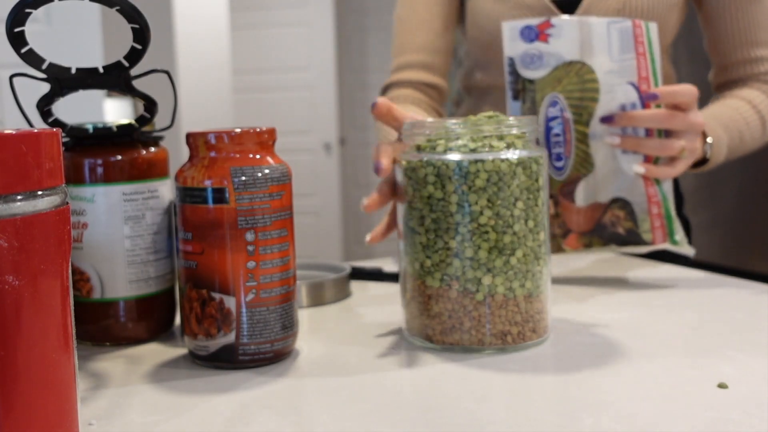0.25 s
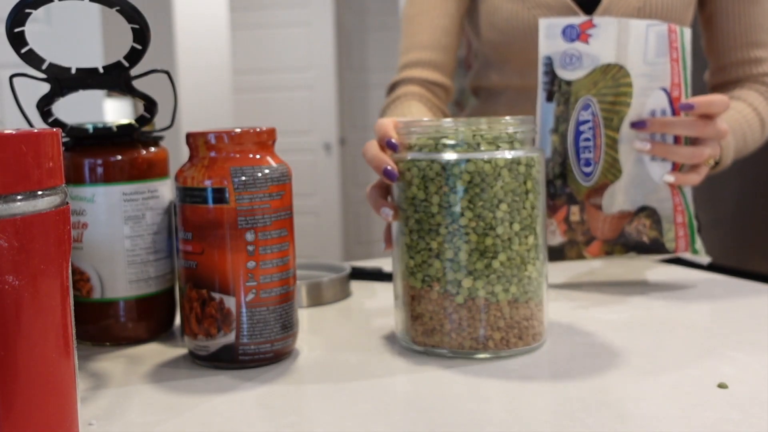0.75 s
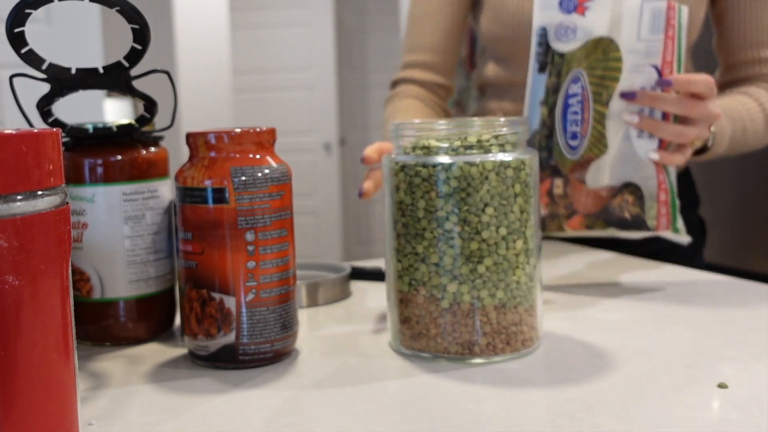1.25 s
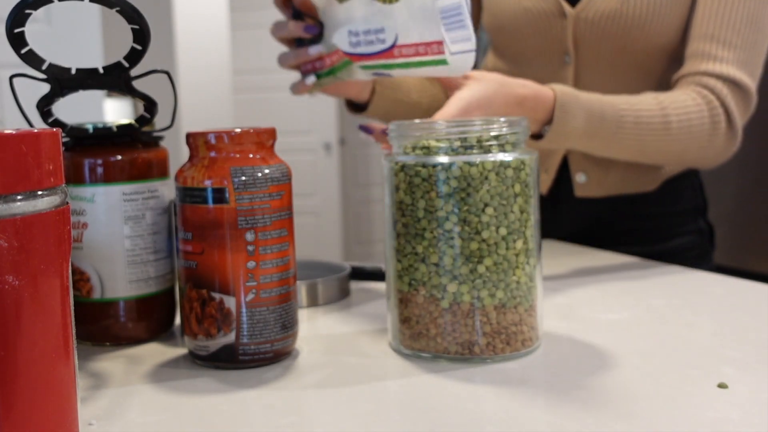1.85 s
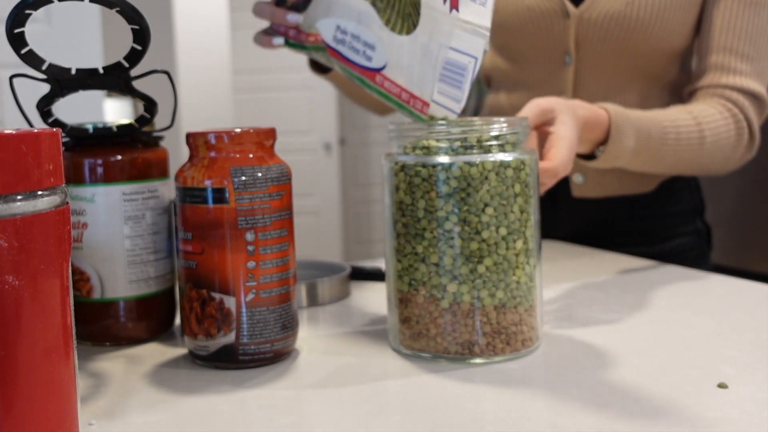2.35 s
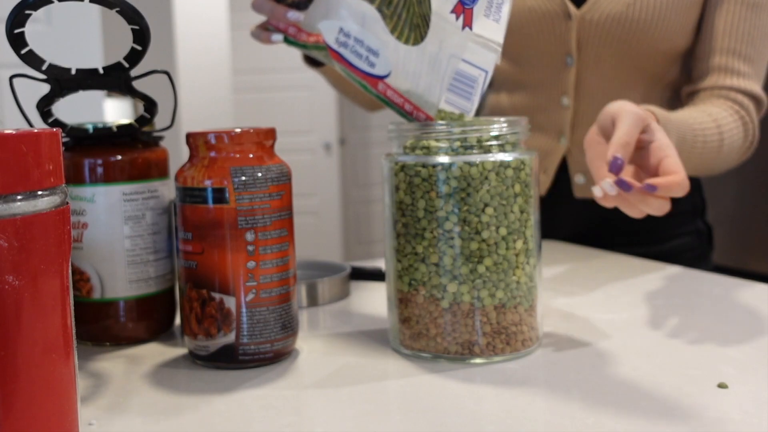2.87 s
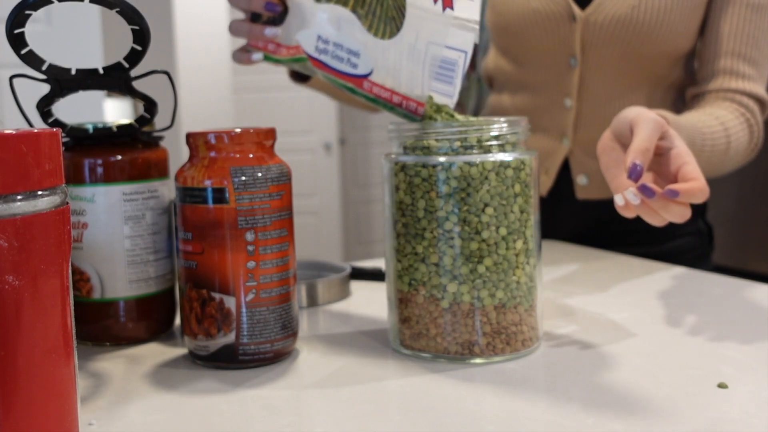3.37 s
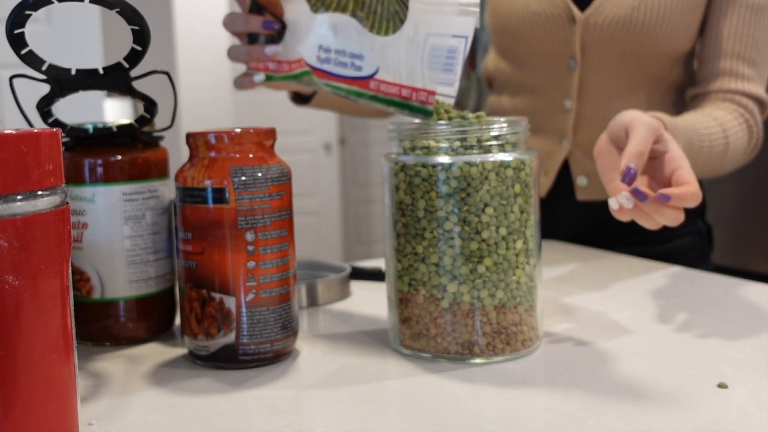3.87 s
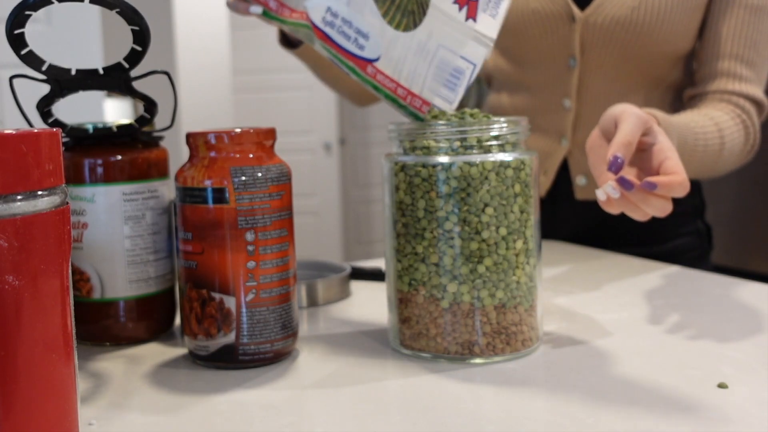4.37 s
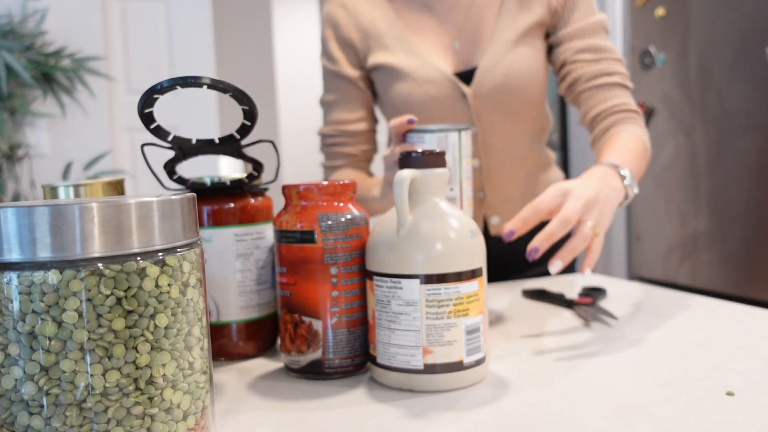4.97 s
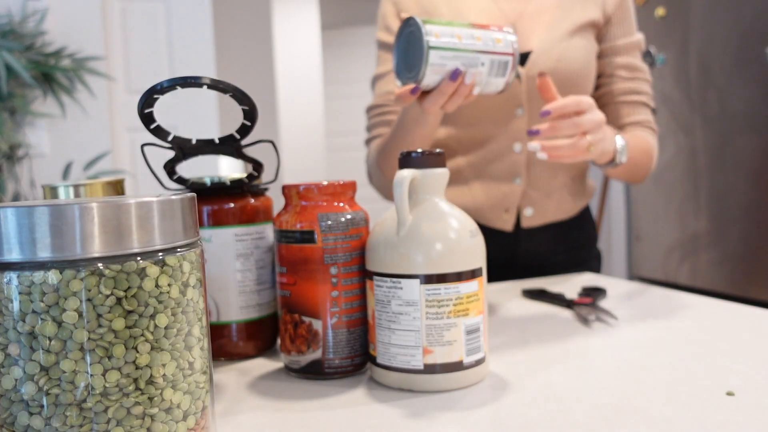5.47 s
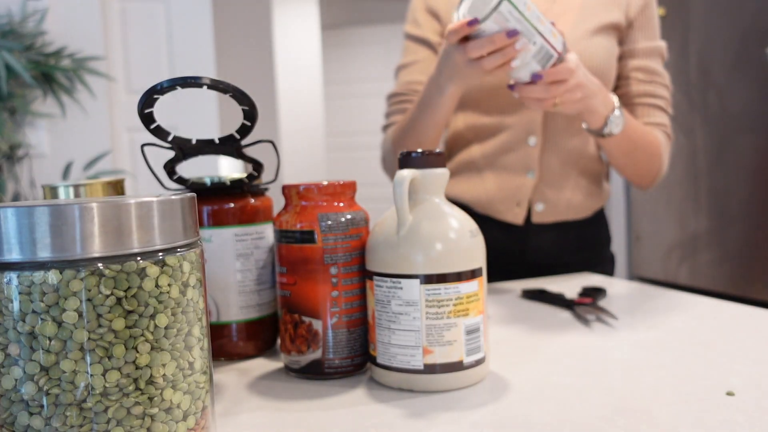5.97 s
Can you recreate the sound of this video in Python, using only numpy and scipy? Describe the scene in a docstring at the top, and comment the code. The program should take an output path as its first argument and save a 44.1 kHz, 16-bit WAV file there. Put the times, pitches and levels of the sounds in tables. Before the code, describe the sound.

Close stereo sound in a small hard kitchen, with low room tone and faint appliance hum. From 0 to 0.3 s a dense rush of dried peas fades amid plastic snaps. From about 0.35 to 1.3 s a full glass jar is rocked and knocked on a stone counter, strongest near 0.36, 0.63, 0.84 and 1.03 s: short, damped, woody-glassy thumps with a slight ring and peas shuffling down. Light handling follows, then a loud bag snap at 1.67 s. Peas pour from 1.8 to 3.5 s, bright and rattling with small crackles, then in thinner, intermittent surges until a sudden cut at 4.6 s. A heavy low bump leads into a soft gritty slide; at 4.95-5.02 s a plastic jug lands and rocks in a loud hollow clatter. Near-quiet follows, with delicate nail ticks and a faint paper brush at 5.6 s and a tiny tick at 6.15 s.

```python
"""Dried peas poured into a glass jar

Dried peas pour from a plastic bag into a glass jar on a stone counter: dense random impacts coloured by resonance.
After the first pour the jar is rocked and tapped down, each blow exciting damped modes, while its peas settle.
A sudden cut between two scenes ends the pouring and its echoes just before a plastic jug slides.
The slide is scraping noise, the jug lands as modal blows, and a fingernail ticks and brushes a can label.
Sparse decaying echoes of a small hard room follow each blow, over filtered noise for a faint appliance hum."""
import sys
import numpy as np
from scipy import signal
from scipy.fft import rfft, irfft
from scipy.io import wavfile
from scipy.ndimage import uniform_filter1d

SR = 44100
rng = np.random.default_rng(int(sys.argv[2]) if len(sys.argv) > 2 else 0)


def store_pcm(level_fs):
    """Save levels as 16-bit WAV."""
    pcm = np.round(np.clip(level_fs, -1, 1) * 32767).astype(np.int16)
    wavfile.write(sys.argv[1], SR, np.atleast_2d(pcm).T)


def gain_from_db(level_db):
    """Convert decibel levels to linear amplitude factors (20 dB per decade)."""
    decades = np.asarray(level_db, float) / 20
    return 10 ** decades


N = 274743  # length in samples

# Room tone spectrum: frequency_hz, relative_density_db
AIR_SPECTRUM = [(15, -58), (25, -33.5), (82, -7), (114, 0.5), (242, -3), (427, 0), (503, -8.5), (545, -4.5),
                (714, 7), (818, -7.5), (1100, -4.5), (1330, -9), (16000, -32.5)]
AIR_LEVEL_DB = -56.5  # rms
# Appliance hum bands: centre_hz, width_hz, level_db
HUM_BANDS = [(226, 210, -65), (715, 75, -67)]
# Left-right likeness of the background: frequency_hz, likeness (0 to 1)
AIR_LIKENESS = [(60, 0.87), (240, 0.46), (950, 0.12), (3770, 0.23), (15000, 0.95)]
# Reverberation time: frequency_hz, t60_s
ROOM_DECAY = [(125, 0.97), (500, 0.36), (2000, 0.41), (6000, 0.35), (14000, 0.25)]
# Left-right likeness of the echoes: frequency_hz, likeness (0 to 1)
ROOM_LIKENESS = [(150, 0.94), (350, 0.94), (1200, 0.78), (3000, 0.98), (12000, 0.98)]
SCENE_CUT_S = 4.597  # a sudden cut between two scenes ends the pouring and its echoes

# Fingernail ticks on the can label: start_s, peak_db, centre_hz
NAIL_TICKS = [(5.6052, -30, 5860), (5.61, -38, 4660), (6.1467, -37.5, 10600)]
# Fingers brushing the paper label: time_s, level_db
BRUSH_LEVEL = [(5.612, -41.5), (5.618, -54.5), (5.75, -75), (5.8, -78)]
# Paper rustle spectrum: frequency_hz, relative_density_db
PAPER_SPECTRUM = [(1470, -46), (2500, -14.5), (3660, -13), (5270, 0), (7500, -6), (11200, -17),
                  (16000, -23)]

# A heavy container is bumped: start_s, peak_db, hardness_db (gain of the high modes), spot_pitch_hz
BUMP_BLOWS = [(4.604, -20, 18, 148), (4.614, -39, 15, 166), (4.623, -17.5, 14, 315), (4.639, -28, -4, 91.5)]
# Modes of the counter, before damping: frequency_hz, width_hz, relative_level_db
COUNTER_MODES = [(84, 100, -6), (150, 85, 4.5), (228, 110, -8), (326, 77, -8.5), (700, 140, -15),
                 (1300, 400, -13.5), (4220, 420, -32.5)]
# The jug slides over the counter: time_s, level_db
SLIDE_LEVEL = [(4.6, -35), (4.66, -37), (4.76, -39.5), (4.84, -40), (4.892, -40.5), (4.945, -39)]
# Grit scrape spectrum: frequency_hz, relative_density_db
SCRAPE_SPECTRUM = [(590, -13), (1000, -9), (1870, -6), (2010, -6), (2780, -2.5), (3800, -4), (4260, -5.5),
                   (9600, -19), (14100, -29), (16000, -41.5)]
# The jug lands and rocks: start_s, peak_db, hardness_db, spot_pitch_hz
JUG_BLOWS = [(4.945, -16, -3, 710), (4.951, -14, -4, 740), (4.961, -12.5, -23, 720), (4.967, -11, 1, 1080),
             (4.972, -4.5, 11, 905), (4.987, -6, 5, 730), (4.991, -15, 14, 650), (5.002, -7.5, -0.5, 640),
             (5.006, -13, 7, 656), (5.013, -17.5, -3, 690)]
# Modes of the plastic jug, before damping: frequency_hz, width_hz, relative_level_db
JUG_MODES = [(88.5, 17, -24), (230, 69, -3), (392, 68, -0.5), (618, 123, -1.5), (738, 90, 3),
             (1010, 160, 2.5), (1080, 370, -5), (1380, 130, -9.5), (1800, 50, -7.5), (2290, 100, -17.5),
             (2770, 110, -22), (2960, 660, -24), (4150, 230, -28), (7680, 230, -41)]

# The jar rings as its base meets the counter, and at 1.997 s as a clump of peas strikes it: start_s, peak_db,
# hardness_db, spot_pitch_hz
JAR_BLOWS = [(0.082, -16, 15, 950), (0.228, -22.5, 14, 860), (0.248, -28, -9, 950), (0.275, -27, -3, 950),
             (0.351, -19, -9, 799), (0.363, -2, -0.5, 697), (0.45, -7, -15, 860), (0.549, -12.5, -3, 710),
             (0.633, -1, -3, 660), (0.645, -6, -6, 573), (0.656, -10, 3.5, 540), (0.709, -23.5, -5, 950),
             (0.75, -11.5, -22, 367), (0.818, -36, 0, 805), (0.838, 0, 5.5, 780), (1.017, -4, -6.5, 814),
             (1.03, -6.5, -22, 830), (1.052, -16, -1, 830), (1.12, -20.5, -7.5, 850),
             (1.229, -19, -20, 840), (1.244, -18, 6.5, 875), (1.299, -30, 31, 738), (1.331, -27, -9, 820),
             (1.379, -29, -8, 860), (1.668, -16, 1, 825), (1.997, -21, -17, 800)]
# Modes of the filled jar, before damping: frequency_hz, width_hz, relative_level_db
JAR_MODES = [(85, 51, -10.5), (221, 40, -6), (365.6, 21, 1), (559.6, 44, 0.5), (712, 51, -2), (799, 97, 5),
             (950, 55, -5), (1138, 110, -3.5), (1417, 190, -1), (1630, 220, -15.5), (1940, 79, -11),
             (2540, 450, -14), (3400, 95, -30), (4020, 240, -26), (6000, 150, -31)]
# Blows that set the free glass wall singing: start_s, level_db
WALL_BLOWS = [(0.633, -34.5), (0.8524, -32.5)]
# Modes of the free glass wall: frequency_hz, relative_level_db, t60_s
WALL_MODES = [(1975, -5, .2), (4237, -3, .27)]
# How hard the full jar rocks on its base: time_s, force_db
ROCKING_FORCE = [(.33, -34.5), (.347, -26.5), (.362, -32), (.368, -18), (.459, -36.5), (.62, -34.5),
                 (.632, -17.5), (.768, -30.5), (.775, -48), (.845, -16.5), (.85, -17.5), (.968, -25.5),
                 (1.018, -41), (1.023, -27), (1.065, -32), (1.118, -37), (1.124, -29.5), (1.2, -46.5),
                 (1.222, -75), (1.228, -28.5), (1.3, -49), (1.4, -81.5)]
CONTACT_RANGE_HZ = 780, 930  # pitches of the spots the base rocks on
# Spectrum of peas shuffling down: frequency_hz, relative_density_db
SHUFFLE_SPECTRUM = [(1760, -36), (3000, -10), (3700, -14), (4380, -16), (4470, -6.5), (5110, -12.5),
                    (5960, -6), (6900, -12.5), (11000, -12.5), (16000, -33)]
SETTLE_DB, SETTLE_PER_DB, SETTLE_S = -24, 1.2, 0.073  # level at 0 dB force, dB per dB, lingering time

# Plastic film snaps and lone peas tick: start_s, peak_db, centre_hz
SNAP_BURSTS = [(0.0207, -7, 2430), (0.1098, -12.5, 2080), (0.2275, -11.5, 2700), (0.793, -28, 5860),
               (1.3536, -47, 5560), (1.4232, -27.5, 2995), (1.5993, -21, 2290), (1.6222, -24.5, 2900),
               (1.6656, -1.5, 2630), (1.6682, -20, 2570), (2.1049, -29, 2320), (3.5746, -23.5, 3780),
               (3.616, -26.5, 3920), (3.7915, -27, 2280), (3.993, -27, 2220), (4.4748, -20.5, 2540),
               (4.6034, -24, 3720), (4.6533, -30, 3970), (4.9437, -24, 2770), (4.9571, -19, 4990),
               (4.9612, -9.5, 2085)]
SNAP_EDGE_DB, TICK_EDGE_DB = -33, -7.5  # added treble edge of each burst
CRACKLES_PER_S, CRACKLE_ABOVE_FLOW_DB, CRACKLE_HZ = 30, 8, 2700  # rate, most above the flow, base pitch
# Peas falling on the heap, one curve for each tilt of the bag: time_s, flow_db
POUR_CURVES = [
    [(0.0, -22.5), (0.12, -28.5), (0.226, -49.5), (0.229, -27.5), (0.33, -69.5)],
    [(1.376, -68), (1.382, -44.5), (1.5, -44), (1.582, -52.5), (1.592, -35), (1.64, -40.5), (1.662, -25.5),
     (1.689, -35.5), (1.783, -44), (1.867, -34.5), (2.1, -25), (2.375, -28.5), (2.573, -26), (2.743, -28.5),
     (2.915, -26), (2.977, -32), (3.175, -25.5), (3.409, -39.5), (3.533, -51)],
    [(3.536, -47), (3.565, -45.5), (3.575, -38.5), (3.66, -34.5), (3.762, -28.5), (3.872, -59),
     (3.985, -49.5), (3.995, -41.5), (4.05, -40.5), (4.168, -27.5), (4.258, -46), (4.38, -24), (4.456, -32),
     (4.596, -25.5)],
]
# Spectrum of the heap of peas: frequency_hz, relative_density_db
HEAP_SPECTRUM = [(120, -53), (200, -27.5), (647, -7), (1680, -4.5), (2210, 0), (3620, -6), (4950, -5.5),
                 (11300, -13.5), (14000, -19.5), (16000, -32.5)]
# Air resonances in the jar neck and bag: centre_hz, width_hz, gain_db
MOUTH_RESONANCES = [(2580, 2100, 4.5), (4870, 310, 4), (5990, 220, 1)]
# Tone of the pour over time: full at first, dull after the bag snap, thinner later, with varying treble:
# time_s, low_side_db, treble_db
POUR_TONE = [(0.0, 11, -5), (0.22, 8, -3.5), (0.24, 4.5, -24), (1.4, 4, -9), (1.65, 2.5, -4),
             (1.87, -3.5, -1.5), (2.1, 2.5, 0.5), (2.4, -2, 2.5), (3.4, -4, -5), (3.6, -9.5, 0.5),
             (4.6, -6, -2.5)]
FULL_FLOW_DB = -28  # flow at which the tone curve holds unaltered
LOW_PER_DB, TREBLE_PER_DB = -0.0745, -0.02  # gains in dB per dB of flow above that


def evened(x):
    """Normalization of energy: scales to rms 1."""
    return x / np.sqrt(np.mean(x ** 2) + 1e-20)


def read(points, hz):
    """Spectral interpolation: reads a table on a logarithmic frequency axis."""
    f, value = np.transpose(points)
    return np.interp(np.log(hz + 1), np.log(f + 1), value)


def along(rows, column, t, outside):
    """Linear interpolation in time of one column, with a fixed value outside the curve."""
    rows = np.array(rows)
    return np.interp(t, rows[:, 0], rows[:, column], outside, outside)


def add(mix, s, sound):
    """Superposition: adds a sound to the mix in place, starting at s seconds."""
    part = mix[round(s * SR):][:len(sound)]
    part += sound[:len(part)]


def shaped(x, field_db):
    """Time-varying filtering: a gain in dB for each frequency and time."""
    hz, t, z = signal.stft(x, SR, nperseg=256, noverlap=192)
    z = z * gain_from_db(field_db(hz[:, None], t))
    return signal.istft(z, SR, nperseg=256, noverlap=192)[1][..., :x.shape[-1]]


def paired(z, hz, likeness):
    """Partial coherence: two channel spectra share a part set at each frequency."""
    c = np.clip(read(likeness, hz), 0, 1)
    near, apart = np.sqrt((1 + c) / 2), np.sqrt((1 - c) / 2)
    return np.array([near * z[0] + apart * z[1], near * z[0] - apart * z[1]])


def clicks(per_s, spread_db):
    """Shot noise: random impulses of either sign, a few of them large."""
    size = gain_from_db(spread_db * np.minimum(rng.exponential(1, N), 4))
    sign = rng.choice([-1., 1.], N)
    return evened(size * sign * (rng.random(N) < per_s / SR))


def patches(depth_db):
    """Smoothed randomness: drifting lumps of gain over frequency and time."""
    field = rng.standard_normal((N // 64 + 9, 129)).T  # one value per short-time bin
    field = uniform_filter1d(field, size=4, axis=0)
    return depth_db * evened(uniform_filter1d(field, size=14, axis=1))


def grains(colour, per_s, spread_db, patchy_db, count=5):
    """Granular impact noise: grains of each size tick in their own part of the spectrum."""
    lumps = patches(patchy_db)
    hz = np.fft.rfftfreq(N, 1 / SR)
    octave = np.clip(np.log2((hz + 1) / 700), 0, count - 1)
    spectrum = 0
    for k in range(count):
        share = np.cos(np.pi / 2 * np.clip(octave - k, -1, 1))
        spectrum = spectrum + rfft(clicks(per_s * (1 + .3 * k), spread_db)) * share  # higher bands are denser
    return evened(shaped(irfft(spectrum, N), lambda hz, t: read(colour, hz) + lumps[:, :len(t)]))


def ring(modes, hard_db, spot_hz, damping, count=4):
    """Modal impact: clusters of damped modes, loudest near the struck spot's pitch."""
    hz, width, db = np.repeat(modes, count, axis=0).T[:, :, None]
    chance = rng.standard_normal((len(hz), 3)).T[:, :, None]
    t = np.arange(4000) / SR
    db = db + hard_db * np.clip(np.log2(hz / 800) / 2, 0, 1) + 2 * chance[0]
    db = db + 7 * np.exp(-(np.log2(hz / spot_hz) / 0.23) ** 2)
    hz, width = hz + 0.52 * width * chance[1], width * damping
    rise = 1 - np.exp(-(t * hz / 1.01) ** 2)  # each mode swells over about one cycle
    decay = np.exp(-np.pi * width * t)
    waves = gain_from_db(db) * width * rise * decay * np.sin(2 * np.pi * (hz * t + chance[2]))
    return waves.sum(0)


def taps(rows, modes, damping):
    """Modal excitation: single blows, with damping scaling the width of every mode."""
    out = np.zeros(N)
    for s, db, hard_db, spot_hz in rows:
        sound = ring(modes, hard_db, spot_hz, damping)
        add(out, s, gain_from_db(db) * sound / abs(sound).max())
    return out


def snaps(rows, edge_db):
    """Transient radiation: short decaying noise bursts around a centre, topped by a sharp edge."""
    out, t = np.zeros(N), np.arange(1500) / SR
    for s, db, hz in rows:
        burst = rng.standard_normal(len(t)) * np.exp(-t / 0.0017)
        edge = signal.lfilter(*signal.butter(2, hz * 0.87, "highpass", fs=SR), burst)
        core = signal.lfilter(*signal.butter(2, min(hz * 1.24, 20000), fs=SR), edge)
        sound = core + gain_from_db(edge_db) * edge
        add(out, s, gain_from_db(db) * sound / abs(sound).max())
    return out


def noise_pair(gain, hz):
    """Filtered Gaussian noise: a partly coherent stereo pair of rms 1."""
    z = rfft(rng.standard_normal((2, N)))
    return evened(irfft(paired(z * gain, hz, AIR_LIKENESS), N))


def air():
    """Stationary noise: room tone and hiss, with two resonant bands of appliance hum."""
    hz = np.fft.rfftfreq(N, 1 / SR)
    out = gain_from_db(AIR_LEVEL_DB) * noise_pair(gain_from_db(read(AIR_SPECTRUM, hz)), hz)
    for f, width, db in HUM_BANDS:
        out = out + gain_from_db(db) * noise_pair(1 / (1 + ((hz - f) / width) ** 2 * 4), hz)
    return out


def tail():
    """Reverberant decay: sparse echoes of random sign, each band dying at its own speed."""
    echo = np.zeros((2, SR // 2))
    slots = np.arange(130, SR // 2 - 20, 20)
    at = slots + rng.integers(0, 20, (2, len(slots)))  # one echo in every 20 samples
    np.put_along_axis(echo, at, rng.choice([-1., 1.], at.shape), 1)
    echo = shaped(echo, lambda hz, t: -60 * t / read(ROOM_DECAY, hz))
    hz = np.fft.rfftfreq(SR // 2, 1 / SR)
    echo = irfft(paired(rfft(echo), hz, ROOM_LIKENESS), SR // 2)
    return echo / np.linalg.norm(echo[0])


def room(x, count=3):
    """Convolution: three random echo patterns fade into one another, so blows do not all sound alike."""
    turn = 2 * np.pi * 1.7 * np.arange(N) / SR  # 1.7 turns per second
    out = 0
    for k in range(count):
        share = np.cos(turn + np.pi * k / count) * np.sqrt(2 / count)
        out = out + signal.fftconvolve((x * share)[None], tail(), axes=1)[:, :N]
    return out


def label():
    """Impact and friction: nail ticks and the rustle of fingers on paper."""
    level_db = along(BRUSH_LEVEL, 1, np.arange(N) / SR, -120)
    rustle = grains(PAPER_SPECTRUM, 3000, 2.8, patchy_db=4.0) * gain_from_db(level_db)
    return snaps(NAIL_TICKS, TICK_EDGE_DB) + rustle


def container_bumps():
    """Structure-borne sound: a heavy container excites the modes of the counter."""
    return taps(BUMP_BLOWS, COUNTER_MODES, damping=0.8)


def jug_slide():
    """Sliding friction: the soft grainy hiss of grit under the jug."""
    level_db = along(SLIDE_LEVEL, 1, np.arange(N) / SR, -120)
    return grains(SCRAPE_SPECTRUM, 3000, 3.0, patchy_db=1.3) * gain_from_db(level_db)


def jug_landing():
    """Modal impact: the plastic jug rings as it lands and rocks."""
    return taps(JUG_BLOWS, JUG_MODES, damping=0.9)


def jar_taps():
    """Modal impact: the jar rings as its base meets the counter or a clump of peas strikes it."""
    return taps(JAR_BLOWS, JAR_MODES, damping=1.6)


def wall():
    """Free vibration: thin clean sinusoids of the glass wall decay exponentially."""
    out, t = np.zeros(N), np.arange(SR // 2) / SR
    for s, db in WALL_BLOWS:
        lines = sum(gain_from_db(d - 60 * t / t60) * np.sin(2 * np.pi * hz * t) for hz, d, t60 in WALL_MODES)
        add(out, s, gain_from_db(db) * lines * (1 - np.exp(-t / 0.00096)))
    return out


def chatter(count=8):
    """Repeated modal excitation: small contacts of base and packed peas ring the rocking jar."""
    force = gain_from_db(along(ROCKING_FORCE, 1, np.arange(N) / SR, -120))
    out = 0
    for spot_hz in np.linspace(*CONTACT_RANGE_HZ, count):
        sound = ring(JAR_MODES, 0, spot_hz, damping=1.7)
        contacts = force * clicks(150, 0.67)
        out = out + signal.oaconvolve(contacts, sound / np.linalg.norm(sound))[:N]
    return out / np.sqrt(count)


def settling():
    """Granular compaction: peas shuffle down in step with the rocking, lingering a little."""
    hiss = grains(SHUFFLE_SPECTRUM, 3000, 2., patchy_db=.8)
    force_db = along(ROCKING_FORCE, 1, np.arange(N) / SR, -120)
    keep = np.exp(-1 / (SETTLE_S * SR))
    shake = signal.lfilter([1 - keep], [1, -keep], gain_from_db(SETTLE_DB + SETTLE_PER_DB * force_db))
    return hiss * shake


def flow_db(t):
    """Source strength: the level of the stream of peas at times t."""
    return np.max([along(rows, 1, t, -120) for rows in POUR_CURVES], axis=0)


def crackle():
    """Random arrivals: small snaps of bag and lone peas follow the flow."""
    when, size, pitch = rng.random((400, 3)).T
    s = np.cumsum(-np.log(1 - when)) / CRACKLES_PER_S  # exponential waiting times
    peak_db = flow_db(s) + CRACKLE_ABOVE_FLOW_DB - 8 * size
    rows = np.transpose([s, peak_db, CRACKLE_HZ * 1.8 ** (pitch - .4)])
    return snaps(rows[s < SCENE_CUT_S], SNAP_EDGE_DB)


def mouth_db(hz, t):
    """Cavity resonance: summed gain of the air in jar neck and bag."""
    return sum(db / (1 + 4 * ((hz - f) / w) ** 2) for f, w, db in MOUTH_RESONANCES)


def pour_db(hz, t):
    """Spectral balance: flow level with its low side and treble changing over time."""
    low_part = np.clip(2.0 * np.log2(1800 / (hz + 1)), 0, 1)
    treble_part = np.clip(np.log2((hz + 1) / 3500), 0, 1)
    excess_db = flow_db(t) - FULL_FLOW_DB
    low_db = along(POUR_TONE, 1, t, 0) + LOW_PER_DB * excess_db
    treble_db = along(POUR_TONE, 2, t, 0) + TREBLE_PER_DB * excess_db
    return flow_db(t) + low_part * low_db + treble_part * treble_db


def peas():
    """Dense shot noise: thousands of hard ticks a second, coloured by heap and jar mouth."""
    heap = grains(HEAP_SPECTRUM, 2500, 2.4, patchy_db=1.5)
    return shaped(evened(shaped(heap, mouth_db)), pour_db)


def scene():
    """Superposition: direct sounds panned by level, one room fed by all sources, and the background."""
    knocks = jar_taps() + jug_landing() + chatter() + wall()
    bumps = container_bumps()
    rustle = peas() + jug_slide() + settling()
    cracks = snaps(SNAP_BURSTS, SNAP_EDGE_DB) + crackle()
    can = label()
    # the bump is felt through the counter more than the room
    feed = gain_from_db(-10) * bumps + gain_from_db(-6.5) * knocks + gain_from_db(-11.0) * rustle + gain_from_db(-9.5) * (cracks + can)
    # echoes of the first scene fade out over 5.5 ms at the cut
    early = np.clip((SCENE_CUT_S - np.arange(N) / SR) / 0.0055, 0, 1)
    wet = room(feed * (early > 0)) * early + room(feed * (early == 0))
    # left and right gains in dB: knocks and pour a little right, the can left
    direct = (knocks + bumps) * gain_from_db([[-.8], [.8]]) + (rustle + cracks) * gain_from_db([[-.15], [.15]])
    direct = direct + can * gain_from_db([[1.6], [-1.6]])
    return direct + wet + air()


def roll_off(x):
    """The treble ends steeply here."""
    return signal.sosfilt(signal.butter(12, 16670, fs=SR, output="sos"), x)


def record(dry):
    """Saturation and high-pass filtering: soft overload on the hardest blows, then a bass cut."""
    soft = dry / (1 + (abs(dry) / .85) ** 4) ** .25
    cut = signal.sosfilt(signal.butter(4, 62, "highpass", fs=SR, output="sos"), soft)
    return roll_off(cut)


dry = scene()
out = record(dry)
store_pcm(out)
```